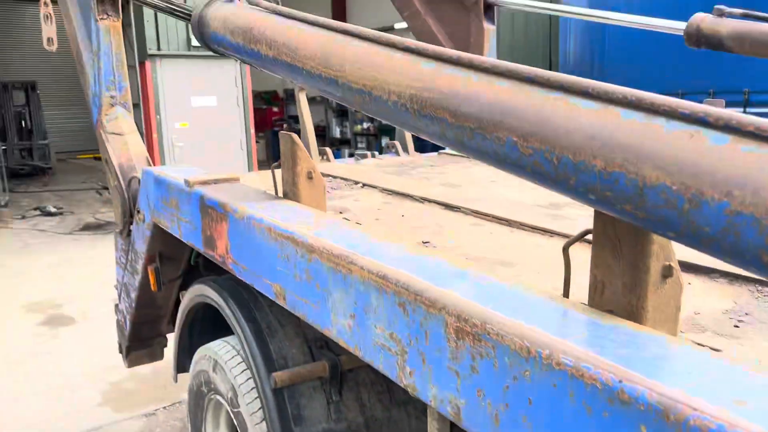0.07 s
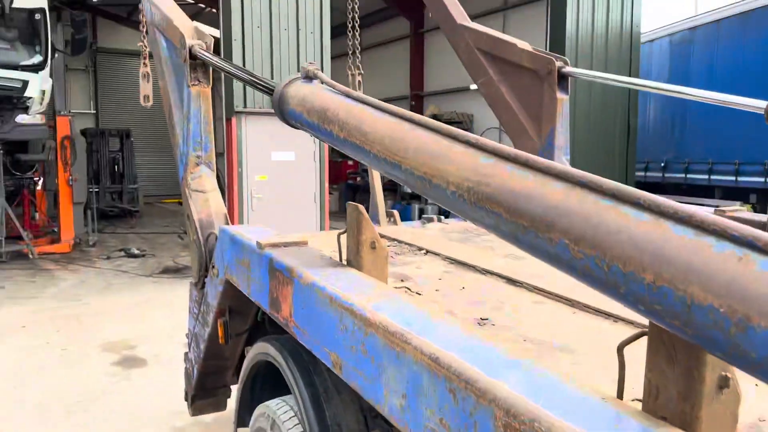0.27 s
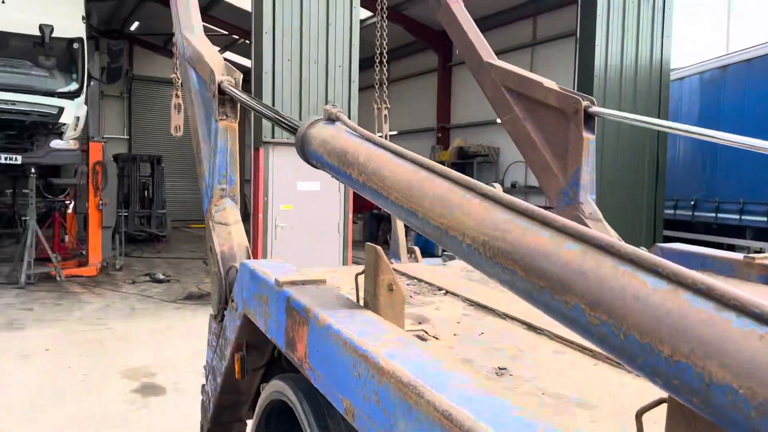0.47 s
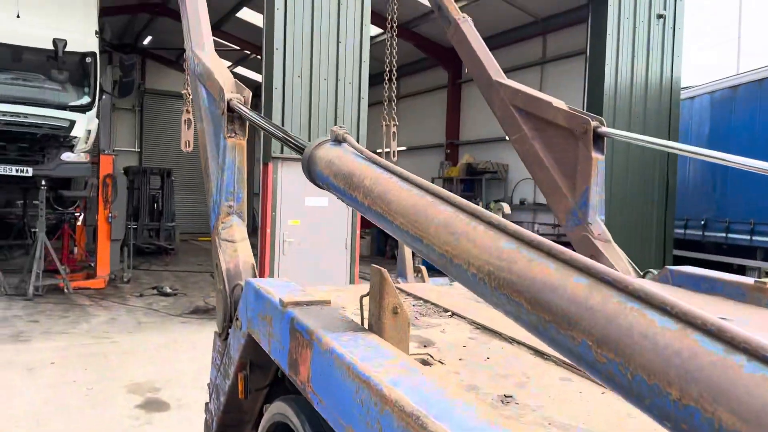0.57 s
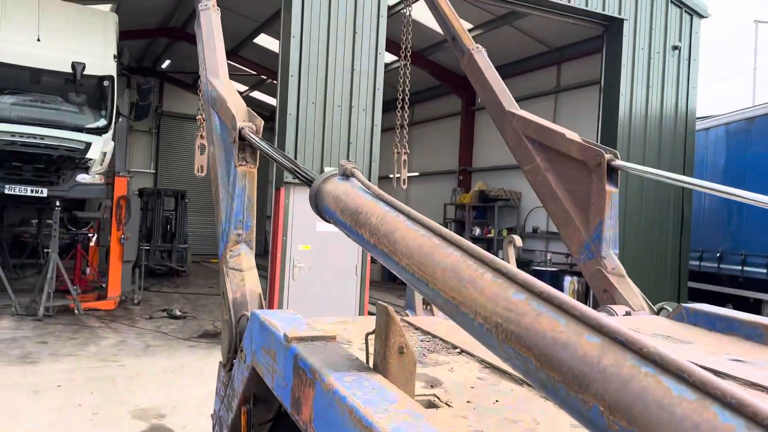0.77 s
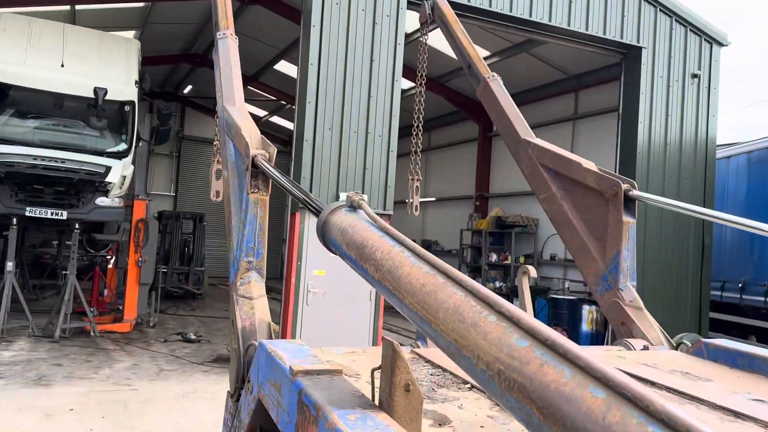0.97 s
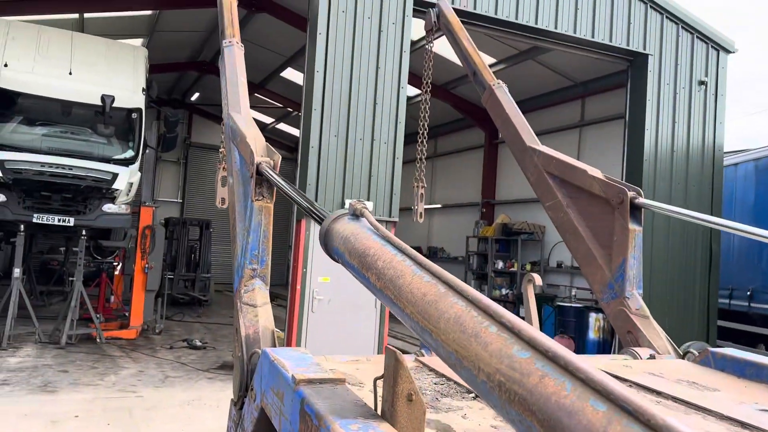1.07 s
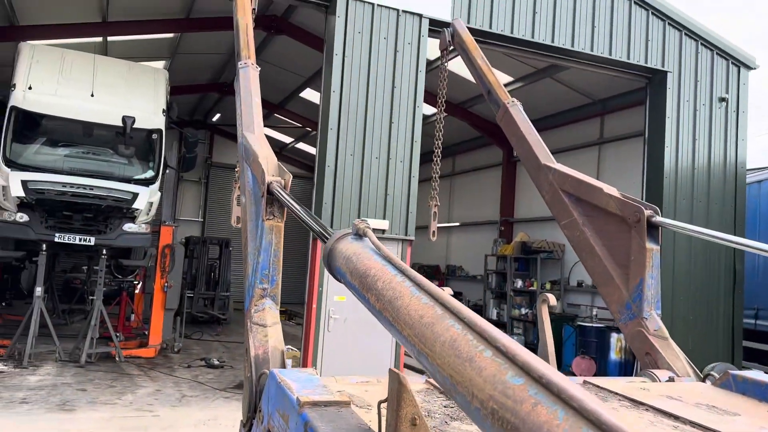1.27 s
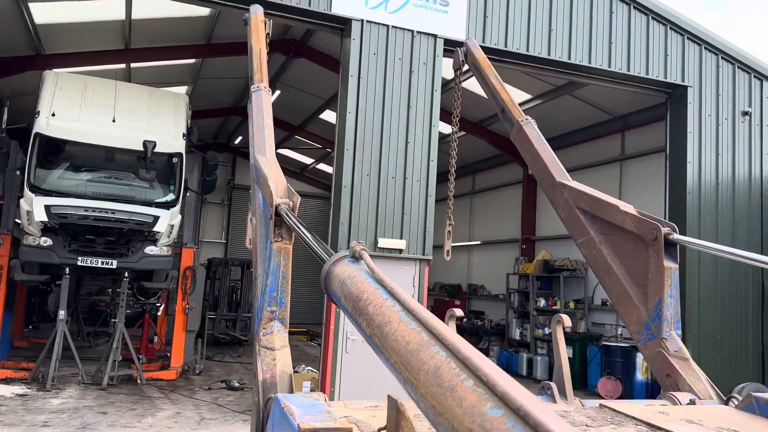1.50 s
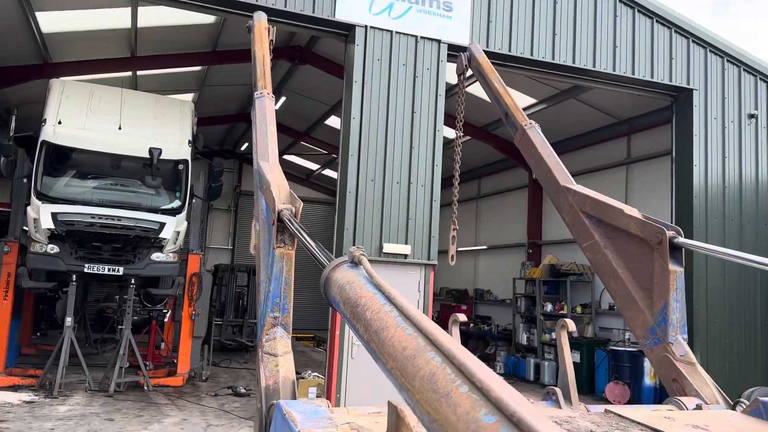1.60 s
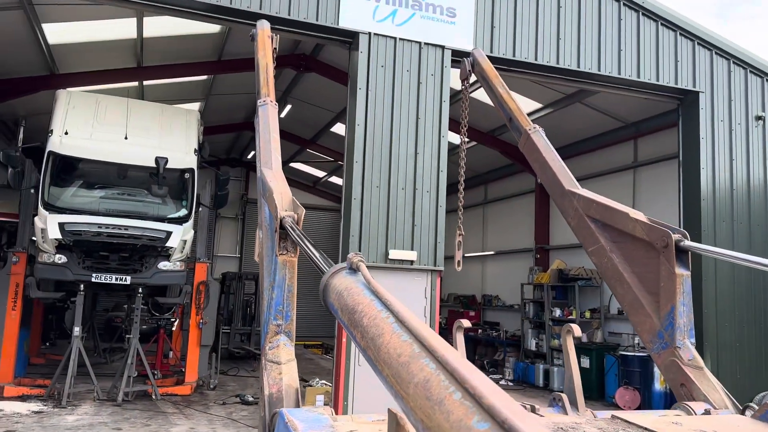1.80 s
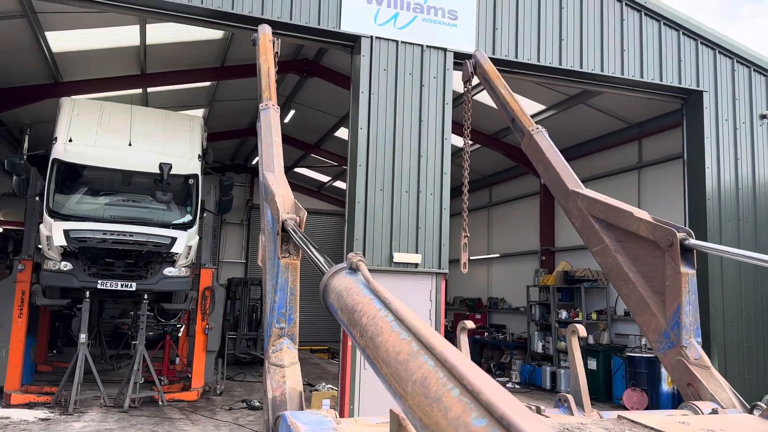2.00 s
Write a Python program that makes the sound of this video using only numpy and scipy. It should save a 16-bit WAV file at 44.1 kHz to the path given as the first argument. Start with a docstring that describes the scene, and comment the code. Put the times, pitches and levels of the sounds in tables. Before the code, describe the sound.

A diesel truck engine idles with a metallic clatter while wind buffets the microphone.

```python
"""A six-cylinder truck diesel idles at 700 rpm in a workshop yard, heard through two microphone ports.
Its firings make the exhaust throb, the metal knock and tick and a panel boom; gears and belt whine thinly.
The throb fades as the microphone tilts up, and a short metallic ring sounds just before 1 s.
Right at the ports, gusts buffet and thump, around 0.5-1.05 s and again around 1.3 s;
the recorder's limiter catches the hardest buffets."""
import sys
import numpy as np
from scipy import signal
from scipy.fft import rfft, irfft, next_fast_len
from scipy.io import wavfile
from scipy.ndimage import uniform_filter1d, minimum_filter1d, map_coordinates

SR = 44100
rng = np.random.default_rng(int(sys.argv[2]) if len(sys.argv) > 2 else 0)


def log_audio(samples):
    """Write samples as a 16-bit WAV file to the path given in sys.argv[1]."""
    # one column per channel
    frames = np.atleast_2d(samples).T
    # limit to full scale, then quantise
    limited = np.clip(frames, -1, 1)
    pcm = np.round(limited * 32767).astype(np.int16)
    wavfile.write(sys.argv[1], SR, pcm)


N = 90404

FIRING_HZ, FIRST_FIRING_S = 35.033, .0095
KNOCK_ATTACK_S, KNOCK_DECAY_S, KNOCK_EDGE_S, KNOCK_SCATTER_DB = .004, .0105, .0025, .8
SLAP_DELAY_S, SLAP_DB = .0092, -6  # second, weaker contact after each firing
RING_DECAY_S, RING_SCATTER_DB = .011, 1.3
TICK_RISE_S, TICK_DECAY_S = .0014, .013
PANEL_RIPPLE_DB, PANEL_SPACING_HZ = 3, 20
WHINE_WANDER_HZ, WHINE_FLICKER_DB = 5, 2.5
STRONG_GUST_DB, FLUTTER_DB, FLUTTER_GROWTH = -10.5, -2, 1.31
THUMP_RISE_S, THUMP_FALL_S, THUMP_WANDER = .0015, .004, .15
PORT_LOW_CUT_HZ, WIND_BALANCE_DB = 34, 1.2
OVERLOAD, CEILING, LIMITER_HOLD_S, LIMITER_RELEASE_S, TOP_HZ = 1.2, .88, .003, .07, 15650

# Strong exhaust lines. Each row: multiple of the crankshaft speed, level in dB.
EXHAUST_ORDERS = [(3, -26.5), (4, -33), (6, -26), (7, -41.5), (7.5, -28), (9, -45), (12, -55), (18, -39),
                  (24, -47), (25, -32.5)]
# Weaker lines from unequal cylinders. Each row: frequency in Hz, level in dB.
EXHAUST_WEAK_LINES = [(25, -57), (52, -47), (90, -29.5), (130, -48), (170, -62), (250, -47), (330, -63),
                      (420, -42.5), (520, -66.5), (700, -56)]
# The exhaust as the microphone tilts. Each row: time in seconds, gain in dB.
EXHAUST_LEVEL = [(0, -4), (.6, -6.5), (1.15, -16), (1.6, -20.5), (2.05, -12)]
# Cylinders in firing order. Each row: relative knock strength in dB, delay in seconds.
CYLINDERS = [(4.5, 0.0022), (4, 0.0038), (4, 0.0028), (3.5, 0.00031), (4.5, 0.00077), (5, 0.0031)]
# Colour of the knock. Each row: frequency in Hz, relative level in dB.
KNOCK_SPECTRUM = [(200, -21.5), (900, -2), (1600, 3), (2200, -0.5), (2650, -1.5), (3200, -8), (3900, -7),
                  (4600, 0.5), (5100, -3), (5900, 2), (6800, -2.5), (7500, -7), (8500, -13), (9200, -11),
                  (10500, -31.5), (13500, -75), (15500, -25.5)]
# Strength of the knock. Each row: time in seconds, level in dB.
KNOCK_LEVEL = [(0, -43.5), (.35, -39.5), (.8, -40.5), (1.3, -38.5), (1.7, -40.5), (2.05, -41)]
# The knock's treble against its body. Each row: time in seconds, gain in dB.
KNOCK_TREBLE = [(0, -1), (.7, -0.5), (1.4, 0), (2.05, 4.5)]
# Engine metal. Each row: cylinder index (rounded in use), pitch in Hz, first and last gain in dB.
METAL_RINGS = [(0, 4340, -45.5, -41), (0, 2520, -45, -41), (0, 4680, -43.5, -48.5), (2.5, 4740, -42, -50),
               (2, 2620, -45, -44.5), (2.5, 6800, -45, -60), (2.5, 2025, -42, -44), (0.5, 2200, -46, -49.5),
               (4, 4340, -40.5, -51), (4, 2025, -47, -42), (5, 5400, -56, -44), (1.5, 6500, -54, -50),
               (5, 6040, -52, -46)]
# The hardest ticks. Each row: start in seconds, level in dB, pitch in Hz.
TICKS = [(0.011, -42, 4650), (0.071, -34, 4540), (.242, -37.5, 4700), (0.296, -30.5, 4550),
         (0.586, -36.5, 4800), (0.695, -32, 4530), (1.21, -35.5, 4370), (1.272, -36, 4760),
         (1.301, -35, 4710), (1.445, -34.5, 4800), (1.723, -33, 5970), (1.783, -32.5, 5970),
         (1.9, -34.5, 6580), (1.957, -33, 4670), (2.041, -32, 4630)]
# The booming body panel. Each row: time in seconds, gain in dB.
BOOM_LEVEL = [(0, -34.5), (.4, -37.5), (1.15, -48.5), (1.6, -54.5), (2.05, -40)]
# Colour of the engine's steady wash. Each row: frequency in Hz, relative level in dB.
WASH_SPECTRUM = [(25, -16), (70, 10.5), (200, 4), (400, -4), (620, 7.5), (900, 4.5), (1200, 2), (1550, 1),
                 (2200, -8), (2700, -8), (3600, -12), (4700, -4.5), (6000, -30), (8500, -15), (10500, -48),
                 (13500, -49), (15500, -39)]
# Strength of the wash. Each row: time in seconds, level in dB.
WASH_LEVEL = [(0, -31), (.6, -33), (1.1, -36), (2.05, -34.5)]
# Gears and belt drive. Each row: pitch in Hz, first and last level in dB.
WHINE_LINES = [(415, -50.5, -60), (612, -42.5, -49.5), (898, -45.5, -58.5), (1003, -55.5, -47.5),
               (1255, -53.5, -57.5), (1402, -51, -55), (1490, -47.5, -44), (2007, -56.5, -50),
               (2550, -53, -58.5), (2627, -57.5, -63)]
# Metal singing on between firings. Each row: time in seconds, level in dB.
SINGING_LEVEL = [(0, -63), (.2, -45.5), (.4, -44.5), (.52, -50), (.8, -58), (.87, -45), (1.02, -60.5),
                 (1.38, -40.5), (1.62, -49), (1.76, -43), (2.05, -47)]
# Brief rings of metal. Each row: start in seconds, level in dB, length in seconds.
CHINKS = [(.909, -24, 0.0049), (.942, -28.5, 0.0081), (.958, -23.5, 0.0099)]
# Faint, high sizzle. Each row: time in seconds, level in dB.
SIZZLE_LEVEL = [(0, -65), (.25, -69), (.9, -65.5), (1.05, -69), (1.22, -61.5), (1.33, -68), (1.92, -72),
                (2.05, -62)]
# Engine noise across the ports. Each row: frequency in Hz, left-right likeness (clipped to +-1 in use).
ENGINE_ALIKE = [(100, 1.7), (300, -1.06), (650, 0.84), (1000, 0.37), (1600, 0.4), (2000, 1.2), (2500, 0.64),
                (3500, 0.7), (4400, 0.5), (5500, 0.56), (7500, 0.2), (9000, 2), (14000, -4.8)]
# The engine's place in the stereo image. Each row: frequency in Hz, left minus right in dB.
ENGINE_BALANCE = [(150, -0.5), (400, -2.5), (800, -3.5), (1700, -5.5), (2500, -2.5), (3200, 0.5),
                  (4300, -1), (5600, 5.5), (7600, 9), (8700, 1.5), (14000, -0.5)]
# The engine's lag at the left port. Each row: frequency in Hz, phase in radians.
ENGINE_LAG = [(20, -0.5), (280, 0.72), (560, 3), (1500, 3.5), (1850, 7.5), (2600, 6), (3600, 8.5),
              (4400, 10.5), (5600, 14.5), (7000, 17.6), (8500, 20.5), (9500, 19.5), (13000, 29.5)]
# Wind at the microphone. Each row: time in seconds, level in dB.
GUST_LEVEL = [(0, -32), (.34, -31), (.46, -25.5), (.56, -18), (.62, -16), (.68, -15.5), (.73, -14.5),
              (.78, -13), (.85, -12.5), (.89, -14), (.93, -18.5), (.99, -12), (1.03, -23.5), (1.13, -35.5),
              (1.22, -26.5), (1.25, -17.5), (1.29, -26.5), (1.39, -20), (1.44, -32.5), (1.57, -38.5),
              (1.63, -46), (1.73, -30.5), (1.8, -42), (2.05, -63)]
# Colours of the wind's rumble, flutter and buffets. Each row: frequency in Hz, relative level in dB.
RUMBLE_SPECTRUM = [(18, -24), (35, -11), (70, 2), (120, -5), (200, -8.5), (350, -15), (550, -25.5),
                   (900, -33.5), (2000, -90), (6000, -120)]
FLUTTER_SPECTRUM = [(40, -3), (130, 3.5), (250, -2.5), (400, -2.5), (600, -21), (900, -30.5), (1500, -40.5),
                    (3500, -77), (7000, -120)]
BUFFET_SPECTRUM = [(25, -12.5), (80, 5), (140, -2), (250, -0.5), (400, 1), (600, -14), (850, -23),
                   (1300, -24), (2000, -38), (3600, -68), (7000, -120)]
# Wind across the ports. Each row: frequency in Hz, left-right likeness (1 is identical).
WIND_ALIKE = [(50, 0.87), (300, 0.94), (1000, 0.66)]
# Eddies. Each row: start in seconds, level in dB, length in seconds, brightness as a frequency ratio.
BUFFETS = [(0.379, -16, 0.014, 0.49), (0.494, -13, 0.013, 0.62), (0.697, -11.5, 0.052, 0.78),
           (0.715, -15, 0.026, 1.51), (.815, -12.5, 0.0087, 1.56), (0.968, -9, 0.0053, 1.14),
           (0.993, -16.5, 0.013, 1), (1.028, -17.5, 0.023, 1.06), (1.068, -24.5, 0.0244, 0.78),
           (1.232, -21, 0.005, 1.48), (1.249, -20.5, 0.016, 1.27), (1.333, -17.5, 0.0033, 1.34),
           (1.339, -20.5, 0.0067, 1.94), (1.371, -15, 0.011, 1.38), (1.38, -15.5, 0.0353, .28),
           (1.463, -21, 0.033, 0.226), (1.523, -26.5, 0.0082, 0.83), (1.555, -30, 0.035, 0.28),
           (1.712, -27, 0.017, 0.58)]
# Vortices. Each row: start in seconds, level in dB, length in seconds, first and last pitch in Hz.
THUMPS = [(.601, -10.5, 0.029, 300, 59), (0.799, -7.5, 0.01, 339.8, 139), (.826, -10, .012, 190, 99),
          (.852, -9, 0.013, 460.6, 119), (0.867, -10.5, 0.0155, 402.2, 108), (0.91, -1.5, 0.0098, 502, 90),
          (.947, -5.5, 0.0081, 397, 213), (0.97, -5, 0.029, 553.8, 67.7), (1.044, -14.5, 0.0083, 430, 212),
          (1.247, -15.5, .018, 382, 141.4), (1.302, -16, 0.0068, 520, 230), (1.339, -14, 0.0141, 725, 180),
          (1.371, -16, 0.022, 423, 60)]


def exhaust():
    """The exhaust throbs in strong orders, with weaker lines between because the cylinders differ."""
    t, cycle_hz = clock(), FIRING_HZ / len(CYLINDERS)
    strong = {round(2 * order): db for order, db in EXHAUST_ORDERS}  # two crank turns per cycle
    throb = np.zeros(N)
    for harmonic in range(4, 110):
        hz = harmonic * cycle_hz
        db = strong.get(harmonic, along(EXHAUST_WEAK_LINES, hz))
        throb += amp(db) * unit_sine(hz * t + rng.random())
    return throb * amp(curve(EXHAUST_LEVEL))


def strokes(cylinder, decay_s, scatter_db):
    """Envelope of one cylinder's firings: a blow and a weaker slap, once per engine cycle."""
    db, delay = CYLINDERS[cylinder]
    cycle_s = len(CYLINDERS) / FIRING_HZ
    first_s = FIRST_FIRING_S + cylinder / FIRING_HZ + delay
    cycle, age = np.divmod(clock() + cycle_s - first_s, cycle_s)
    strengths = amp(db + scatter_db * rng.standard_normal(32))
    firing = blow_shape(age, KNOCK_ATTACK_S, decay_s)
    slap = amp(SLAP_DB) * blow_shape(age - SLAP_DELAY_S, KNOCK_ATTACK_S, decay_s)
    return strengths[cycle.astype(int)] * np.hypot(firing, slap)


def knock():
    """Each firing gives a bright clack and rings that cylinder's own resonances, never twice alike."""
    soften = lambda envelope: uniform_filter1d(envelope, int(KNOCK_EDGE_S * SR))
    firings = sum(strokes(c, KNOCK_DECAY_S, KNOCK_SCATTER_DB) for c in range(len(CYLINDERS)))
    clack = unit(soften(firings)) * patchy(panels(KNOCK_SPECTRUM), depth_db=1.5)
    treble = filtered(clack, lambda hz: 1 - 1 / (1 + (hz / 3000) ** 6))  # above 3 kHz
    clack += (amp(curve(KNOCK_TREBLE)) - 1) * treble
    rings = np.zeros((2, N))
    for cylinder, hz, first_db, last_db in METAL_RINGS:
        envelope = soften(strokes(round(cylinder), RING_DECAY_S, RING_SCATTER_DB))
        rings += amp(np.linspace(first_db, last_db, N)) * envelope * resonance(hz, width_hz=37)
    return amp(curve(KNOCK_LEVEL)) * clack + rings


def ticks():
    """Now and then a stroke lands harder and ticks brightly."""
    t = clock()
    return sum(amp(db) * blow_shape(t - start, TICK_RISE_S, TICK_DECAY_S) * resonance(hz, width_hz=140)
               for start, db, hz in TICKS)


def boom():
    """Two of the six firings shake a body panel, once per turn of the crankshaft."""
    blows = sum(strokes(cylinder, decay_s=.022, scatter_db=RING_SCATTER_DB) for cylinder in (1, 4))
    return amp(curve(BOOM_LEVEL)) * blows * resonance(centre_hz=286, width_hz=40)


def wash():
    """The engine's steady noise under the clatter."""
    return amp(curve(WASH_LEVEL)) * panels(WASH_SPECTRUM)


def panels(spectrum):
    """Engine noise rippled by the many narrow resonances of block and bodywork."""
    ripple = rng.standard_normal(2048)
    ripple = unit(ripple - uniform_filter1d(ripple, size=5))
    ripple_db = lambda hz: PANEL_RIPPLE_DB * map_coordinates(ripple, [hz / PANEL_SPACING_HZ], mode="wrap")
    return noise(lambda hz: amp(along(spectrum, hz) + ripple_db(hz)), ENGINE_ALIKE)


def whine():
    """Gears and belt give unsteady tones; echoes shift each one's phase between the ports."""
    tones = np.zeros((2, N))
    for hz, first_db, last_db in WHINE_LINES:
        turns = np.cumsum(hz + WHINE_WANDER_HZ * wobble(40.22)) / SR
        echo_radians = .6 * rng.standard_normal((2, 1))
        level_db = np.linspace(first_db, last_db, N) + WHINE_FLICKER_DB * wobble(24.76)
        tones += amp(level_db) * unit_sine(turns, echo_radians)
    return tones


def singing():
    """A thin metallic ring comes and goes under the clatter."""
    flicker_db = 3 * wobble(11)
    return amp(curve(SINGING_LEVEL) + flicker_db) * resonance(centre_hz=5920, width_hz=70)


def chinks():
    """A few quick, high rings of metal."""
    pitch_hz = 6060 + 35 * wobble(390)
    return bursts(CHINKS, rise=.0039) * unit_sine(np.cumsum(pitch_hz) / SR)


def sizzle():
    """A faint band of hiss far above the clatter."""
    return amp(curve(SIZZLE_LEVEL)) * resonance(centre_hz=13450, width_hz=310)


def wind():
    """Wind on the microphone: the rumble follows the gust, and the flutter grows faster than it."""
    gust_db = curve(GUST_LEVEL)
    rumble = even(rush(RUMBLE_SPECTRUM, WIND_ALIKE), size=900)
    flutter_db = STRONG_GUST_DB + FLUTTER_DB + FLUTTER_GROWTH * (gust_db - STRONG_GUST_DB)
    flutter = unit(amp(2.1 * wobble(110)) * rush(FLUTTER_SPECTRUM, WIND_ALIKE))
    return amp(gust_db) * rumble + amp(flutter_db) * flutter


def buffets():
    """Single eddies hit the ports: small fast ones are brighter, big slow ones thud."""
    low_cut = lambda hz: hz / np.hypot(hz, PORT_LOW_CUT_HZ)  # the ports lose the deepest bass
    eddies = np.zeros((2, N))
    for start, db, length, brightness in BUFFETS:
        eddy = noise(lambda hz: amp(along(BUFFET_SPECTRUM, hz / brightness)) * low_cut(hz), WIND_ALIKE)
        eddies += bursts([(start, db, length)], rise=.0013) * even(eddy, size=260)
    return eddies


def thumps():
    """A vortex swings the pressure at the ports a few times, with a falling pitch."""
    t, pressure = clock(), np.zeros(N)
    for start, db, length, first_hz, last_hz in THUMPS:
        period = np.interp(t, [start, start + length], [1 / first_hz, 1 / last_hz])
        turns = np.cumsum(np.exp(THUMP_WANDER * wobble(500)) / period) / SR + rng.random()
        edge = np.clip(np.minimum((t - start) / THUMP_RISE_S, (start + length - t) / THUMP_FALL_S), 0, 1)
        pressure += amp(db) * np.sin(edge * np.pi / 2) ** 2 * unit_sine(turns)
    return pressure


def resonance(centre_hz, width_hz):
    """A narrow band of engine noise with an even level."""
    return even(noise(lambda hz: 1 / (1 + ((hz - centre_hz) / width_hz) ** 2), ENGINE_ALIKE), size=700)


def rush(spectrum, alike):
    """Stereo noise coloured by (Hz, dB) points."""
    return noise(lambda hz: amp(along(spectrum, hz)), alike)


def noise(gain, alike):
    """Stereo noise of rms 1 with a given gain and left-right likeness by frequency."""
    turn = lambda hz: np.arccos(np.clip(along(alike, hz), -1, 1)) / 2
    mid, side = filtered(rng.standard_normal((2, N)),
                         lambda hz: gain(hz) * np.array([np.cos(turn(hz)), np.sin(turn(hz))]))
    return unit(np.array([mid + side, mid - side]))


def patchy(x, depth_db):
    """Give a sound a slightly different colour from one stroke to the next."""
    spectra = signal.stft(x, nperseg=256)[2]
    patches = uniform_filter1d(rng.standard_normal(spectra.shape[1:]), size=4, axis=0)
    patches = unit(uniform_filter1d(patches, size=9, axis=1))
    return unit(signal.istft(spectra * amp(depth_db * patches), nperseg=256)[1][:, :N])


def even(x, size):
    """Smooth away the chance swells of a noise, over size samples."""
    power = np.mean(x ** 2, axis=0)
    return x / np.sqrt(np.abs(uniform_filter1d(uniform_filter1d(power, size), size)) + 1e-6)


def blow_shape(age, rise_s, decay_s):
    """Envelope of an impact: a straight rise, then an exponential decay."""
    return np.clip(age / rise_s, 0, 1) * np.exp(-np.maximum(age - rise_s, 0) / decay_s)


def bursts(rows, rise):
    """Envelope of (s, dB, length) bursts with soft edges."""
    t = clock()
    return sum(amp(db) * (1 + np.tanh((t - s) / rise)) * (1 - np.tanh((t - s - length) / (2 * rise))) / 4
               for s, db, length in rows)


def filtered(x, response):
    """x times a response of frequency."""
    m = next_fast_len(N + 8192)
    return irfft(rfft(x, m) * response(np.fft.rfftfreq(m, 1 / SR)), m)[..., :N]


def unit_sine(turns, radians=0):
    """A sine of rms 1."""
    return np.sqrt(2) * np.sin(2 * np.pi * turns + radians)


def wobble(rate):
    """A smooth random curve, rate knots a second."""
    return map_coordinates(rng.standard_normal(int(N * rate / SR) + 4), [clock() * rate])


def along(points, hz):
    """(Hz, value) points on a log axis."""
    f, v = np.transpose(points)
    return np.interp(np.log(hz + 1), np.log(f + 1), v)


def curve(rows):
    """(s, value) points joined by lines."""
    return np.interp(clock(), *np.transpose(rows))


def clock():
    """Time of each sample."""
    return np.arange(N) / SR


def amp(db):
    """Decibels to gain."""
    return 10 ** (np.asarray(db) / 20)


def unit(x):
    """Scale to rms 1."""
    return x / np.sqrt(np.mean(x ** 2) + 1e-20)


def scene():
    """The engine reaches the right port first; the wind hits both together."""
    engine = exhaust() + boom() + knock() + ticks() + whine() + singing() + sizzle() + chinks() + wash()
    sides = np.array([[.5], [-.5]])  # left, right
    balance = lambda hz: amp(sides * along(ENGINE_BALANCE, hz))
    lag = lambda hz: np.exp(-1j * sides * along(ENGINE_LAG, hz))
    gusts = (wind() + buffets() + thumps()) * amp(sides * WIND_BALANCE_DB)
    return filtered(engine, lambda hz: balance(hz) * lag(hz)) + gusts


def record(dry):
    """The microphone rounds off the hardest buffets; the recorder limits peaks and cuts the top treble."""
    rounded = dry / (1 + np.abs(dry / OVERLOAD) ** 4) ** (1 / 4)
    excess = np.log(np.maximum(1, np.abs(rounded).max(axis=0) / CEILING))
    release = np.exp(-clock() / LIMITER_RELEASE_S)
    needed_gain = np.exp(-np.maximum.accumulate(excess / release) * release)  # recovers slowly
    hold = int(LIMITER_HOLD_S * SR)
    gain = uniform_filter1d(minimum_filter1d(needed_gain, hold), hold)
    return filtered(rounded * gain, lambda hz: hz < TOP_HZ)


dry = scene()
out = record(dry)
log_audio(out)
```